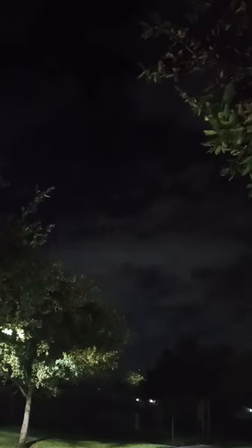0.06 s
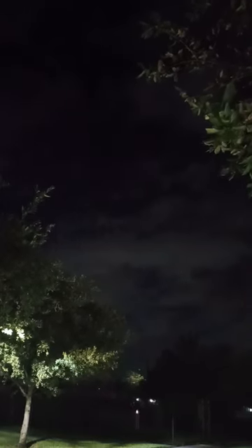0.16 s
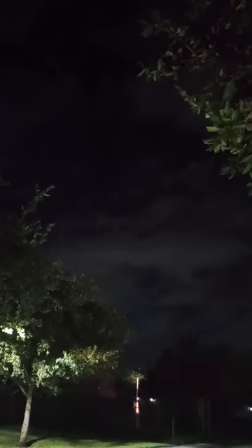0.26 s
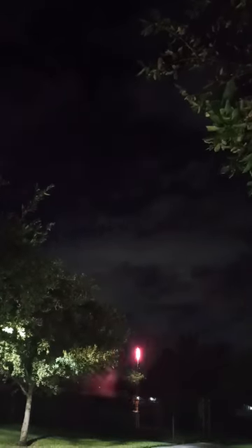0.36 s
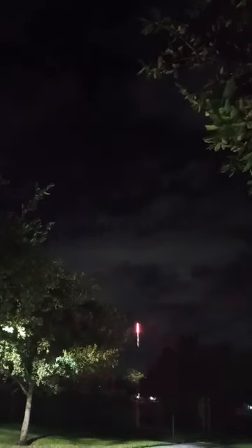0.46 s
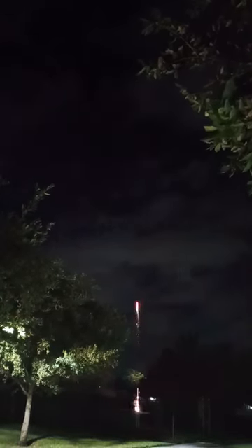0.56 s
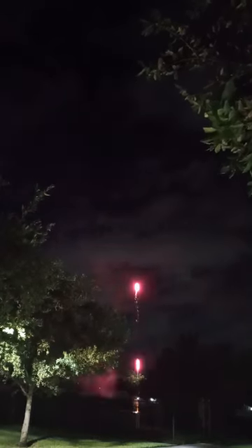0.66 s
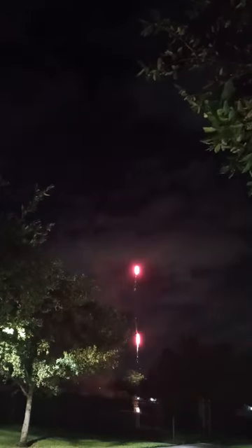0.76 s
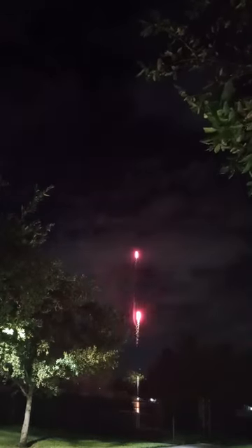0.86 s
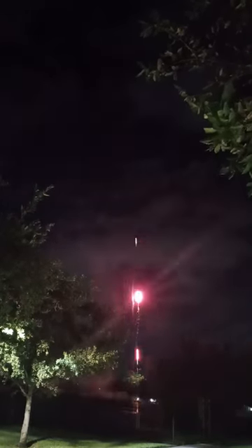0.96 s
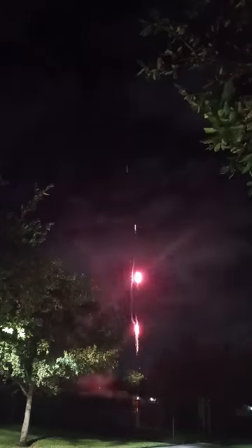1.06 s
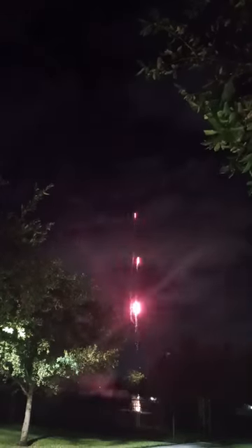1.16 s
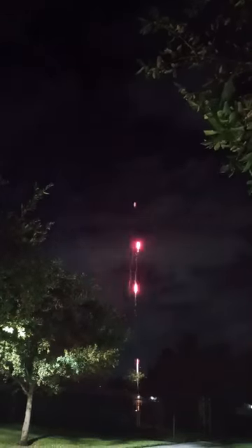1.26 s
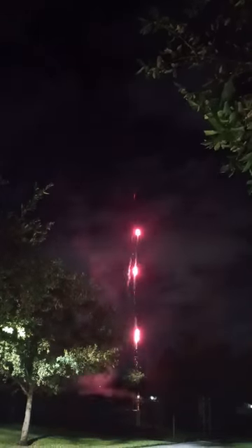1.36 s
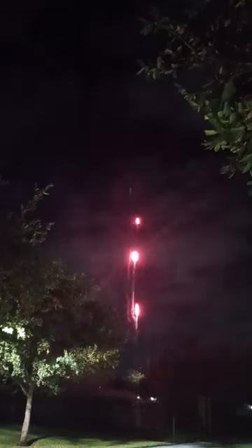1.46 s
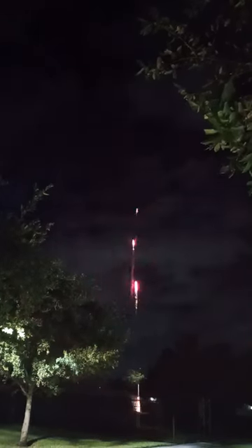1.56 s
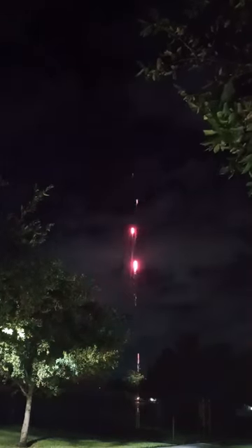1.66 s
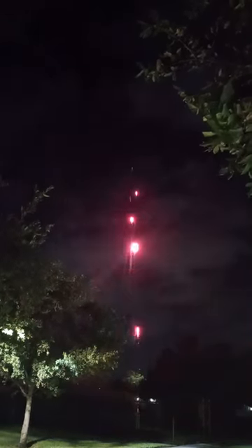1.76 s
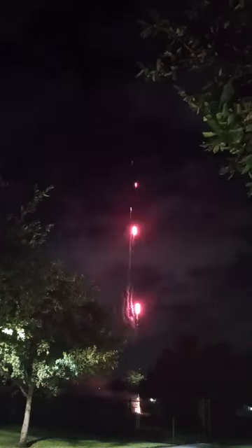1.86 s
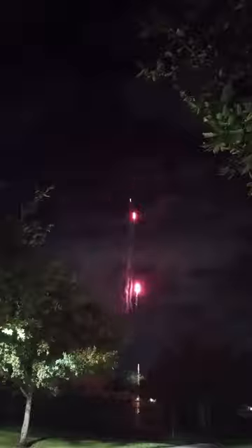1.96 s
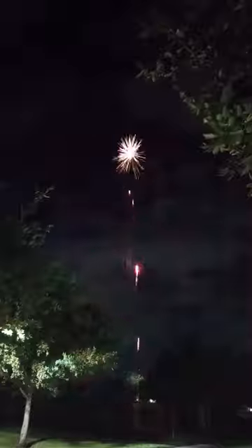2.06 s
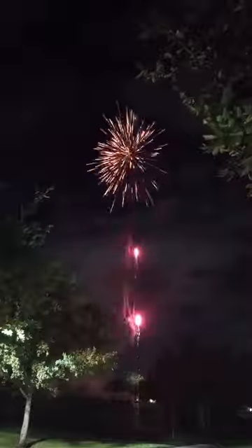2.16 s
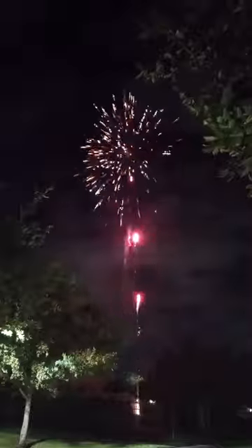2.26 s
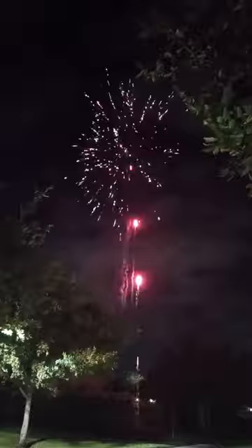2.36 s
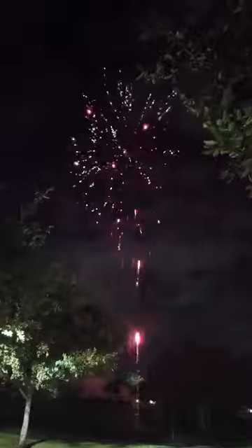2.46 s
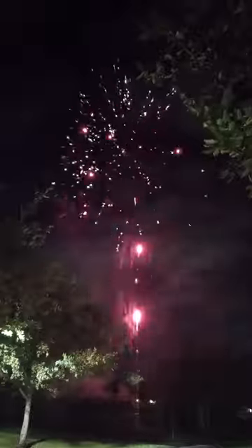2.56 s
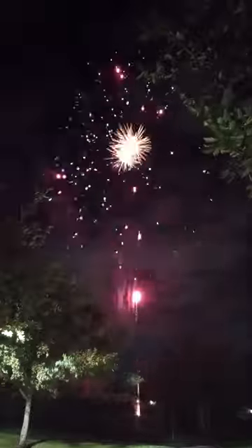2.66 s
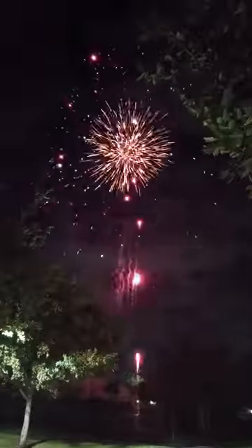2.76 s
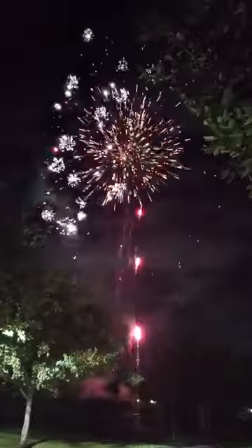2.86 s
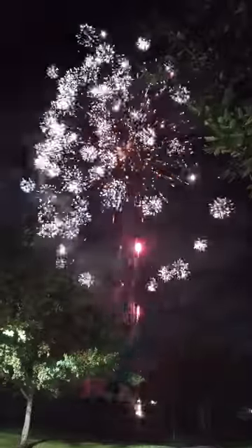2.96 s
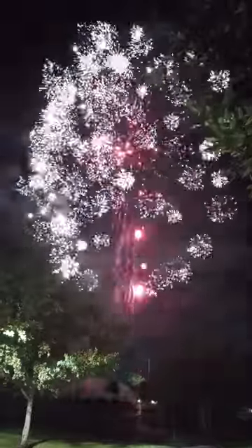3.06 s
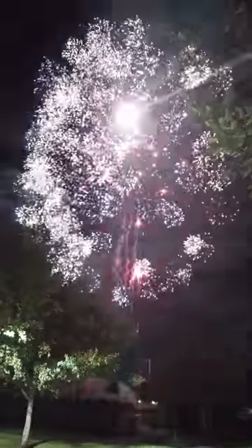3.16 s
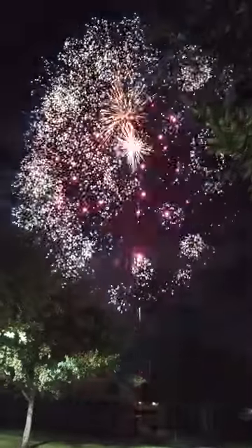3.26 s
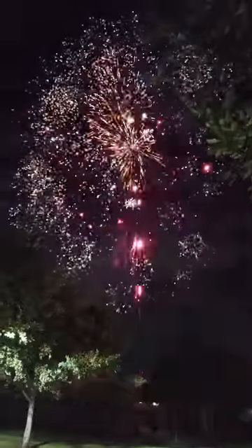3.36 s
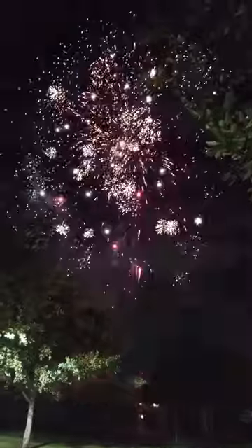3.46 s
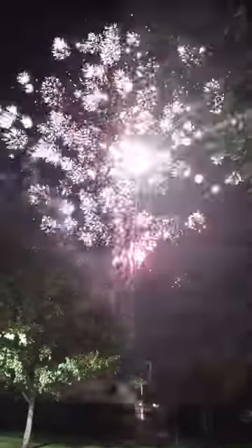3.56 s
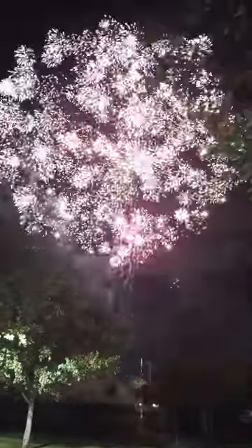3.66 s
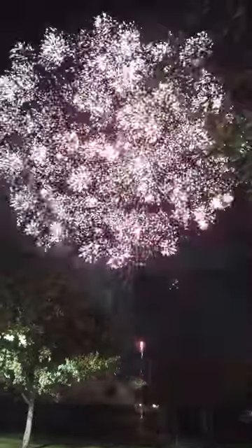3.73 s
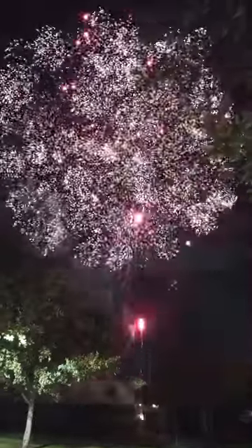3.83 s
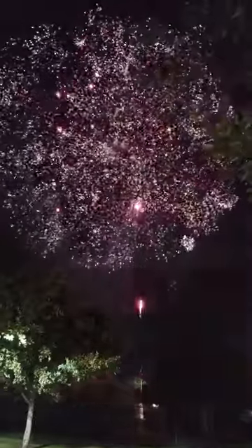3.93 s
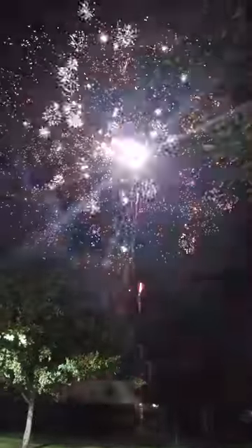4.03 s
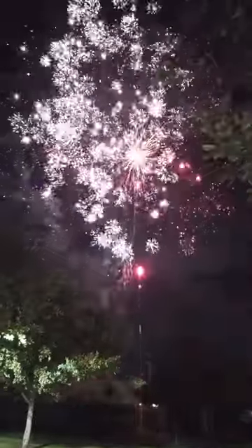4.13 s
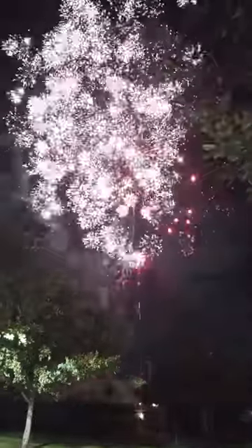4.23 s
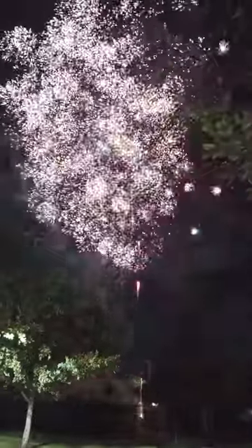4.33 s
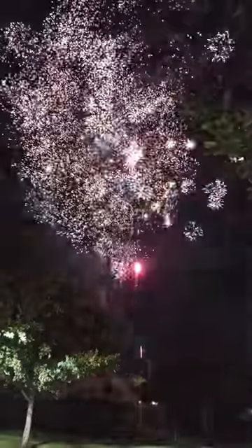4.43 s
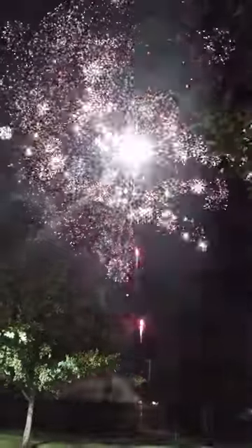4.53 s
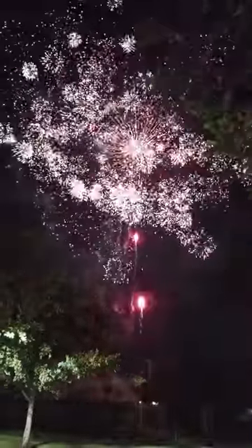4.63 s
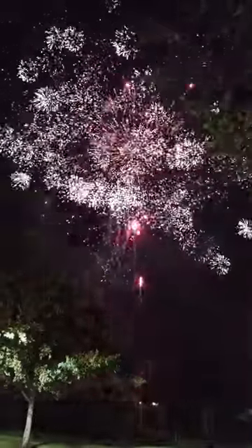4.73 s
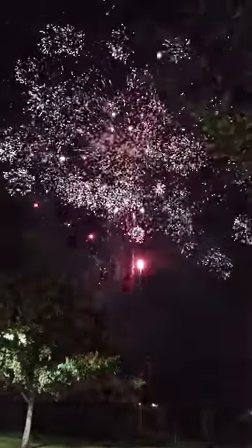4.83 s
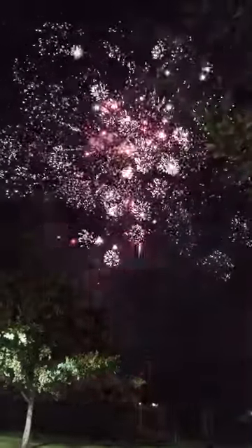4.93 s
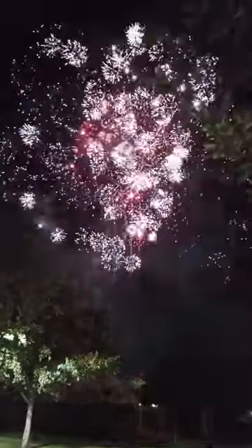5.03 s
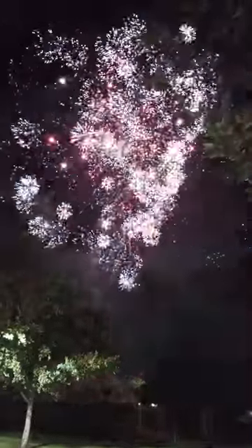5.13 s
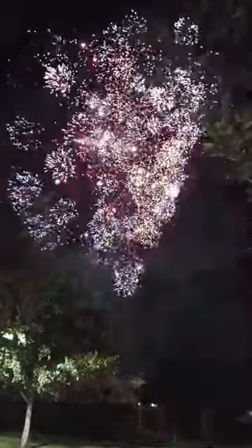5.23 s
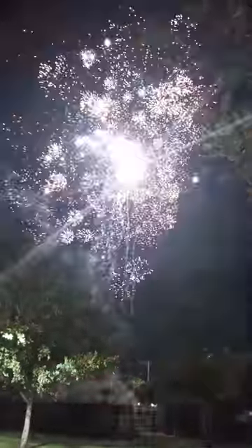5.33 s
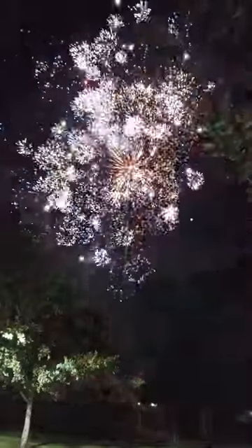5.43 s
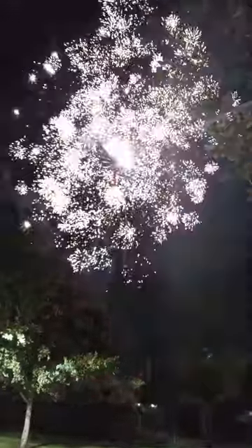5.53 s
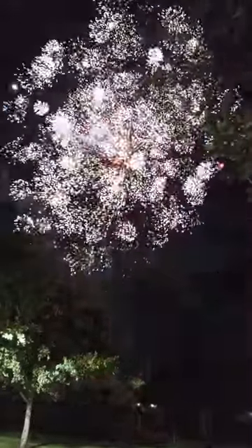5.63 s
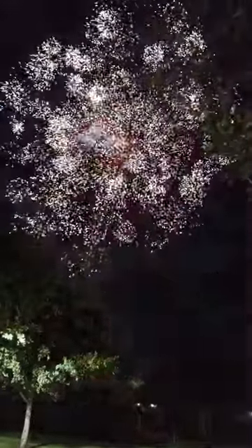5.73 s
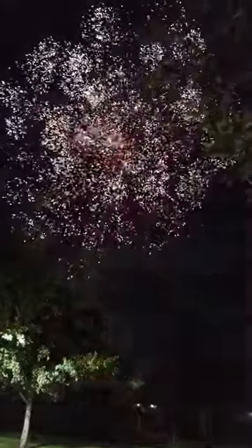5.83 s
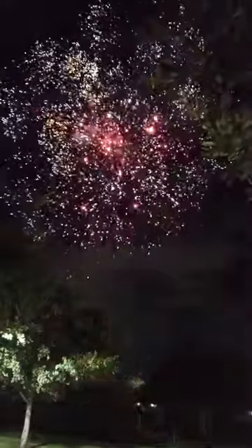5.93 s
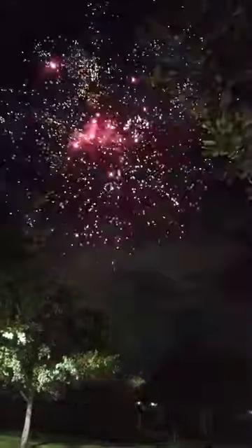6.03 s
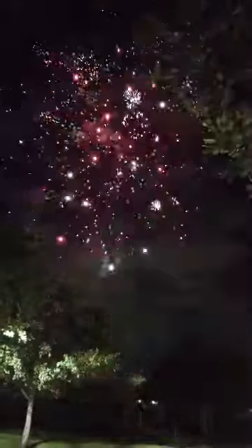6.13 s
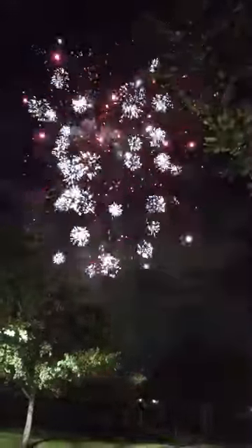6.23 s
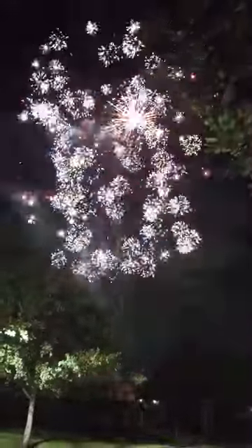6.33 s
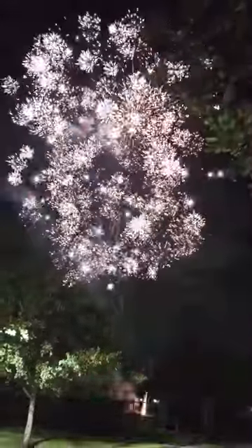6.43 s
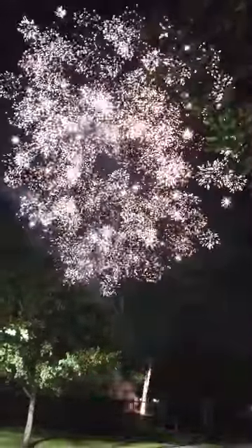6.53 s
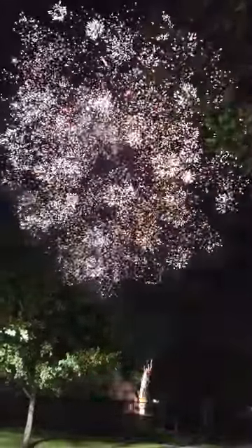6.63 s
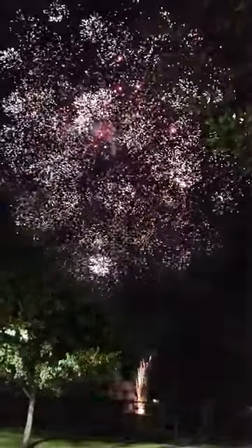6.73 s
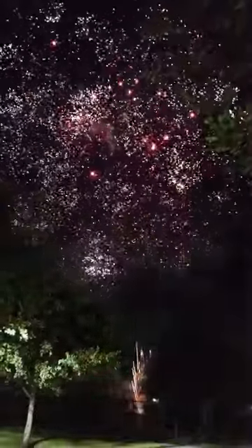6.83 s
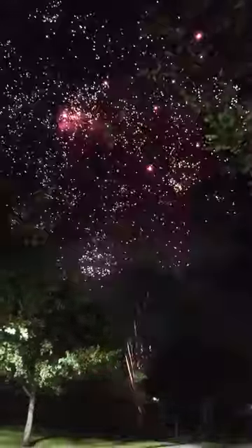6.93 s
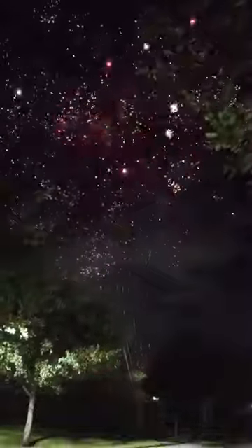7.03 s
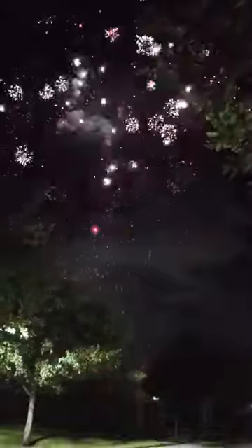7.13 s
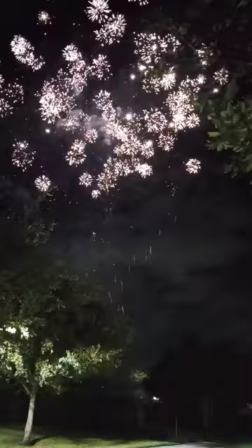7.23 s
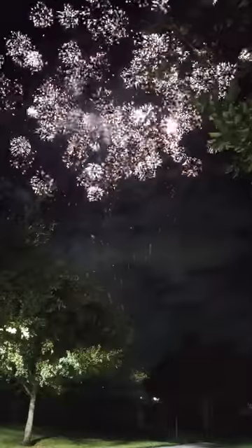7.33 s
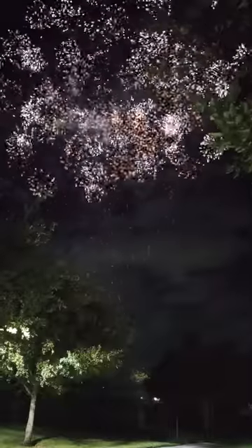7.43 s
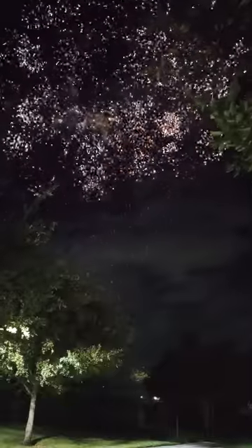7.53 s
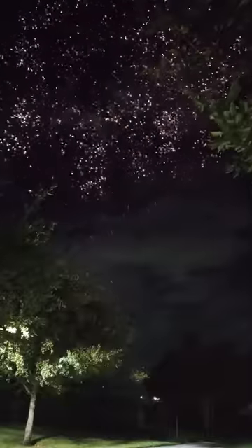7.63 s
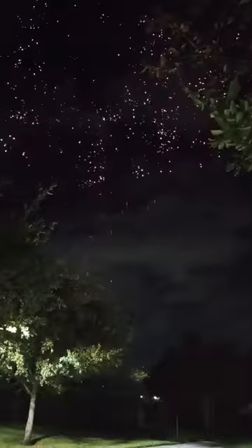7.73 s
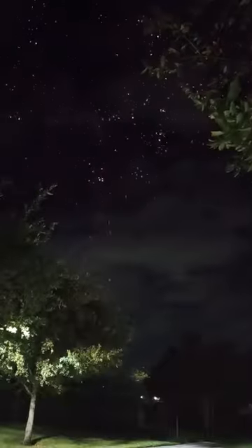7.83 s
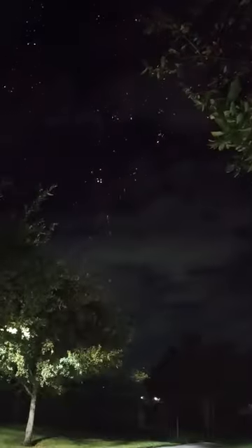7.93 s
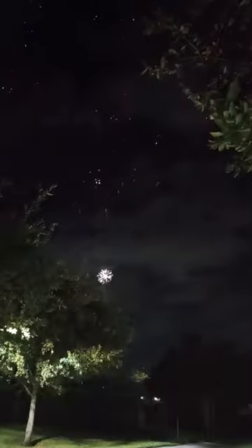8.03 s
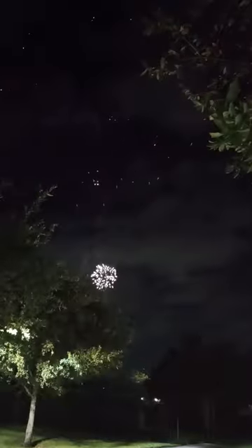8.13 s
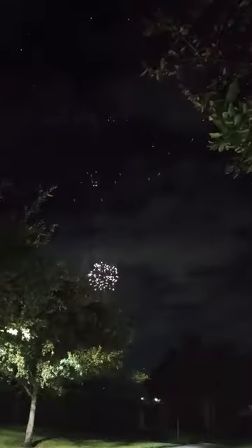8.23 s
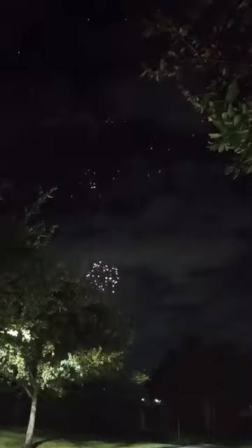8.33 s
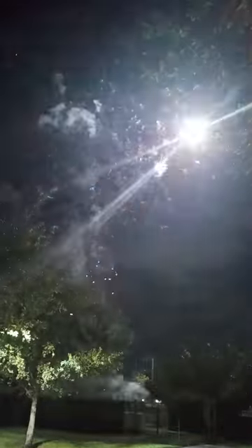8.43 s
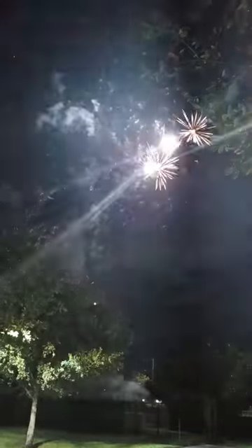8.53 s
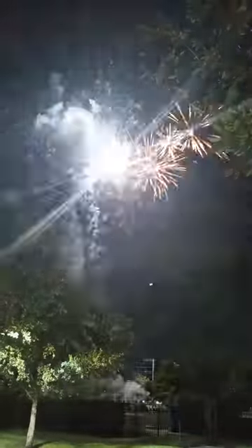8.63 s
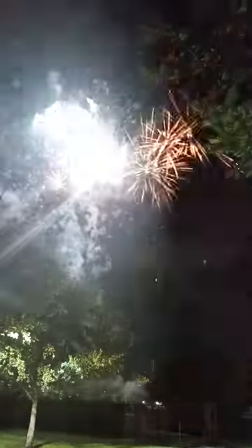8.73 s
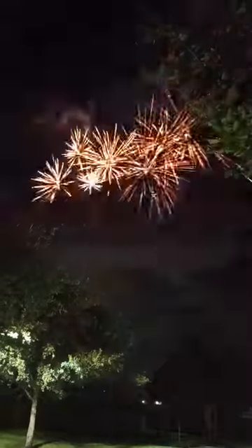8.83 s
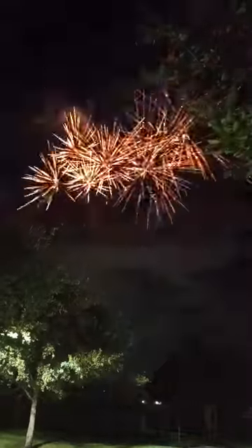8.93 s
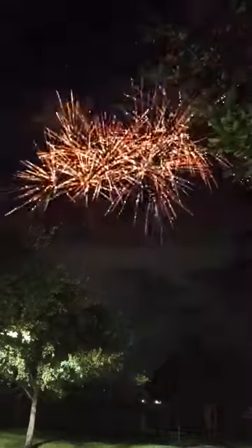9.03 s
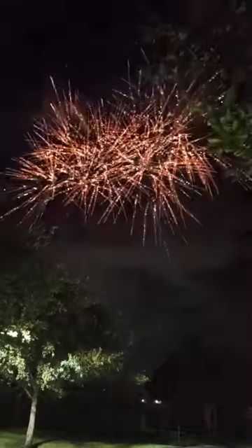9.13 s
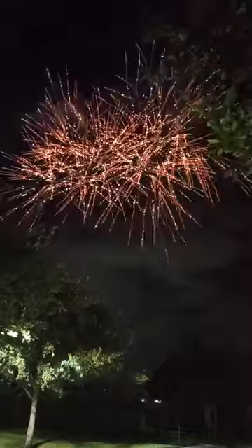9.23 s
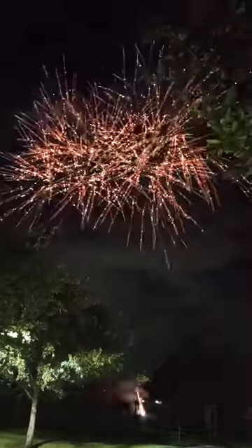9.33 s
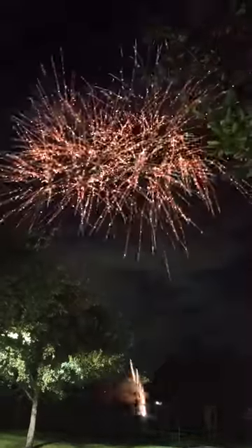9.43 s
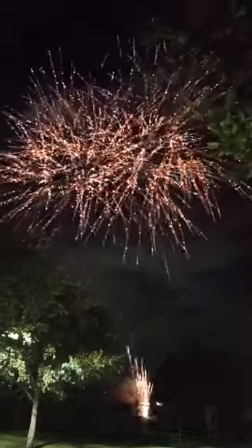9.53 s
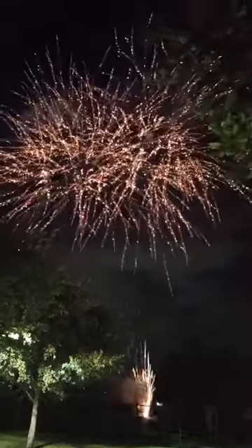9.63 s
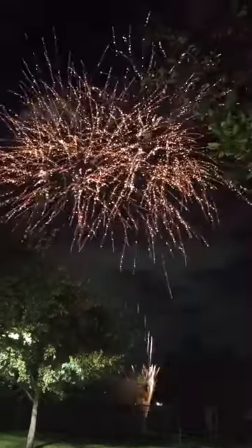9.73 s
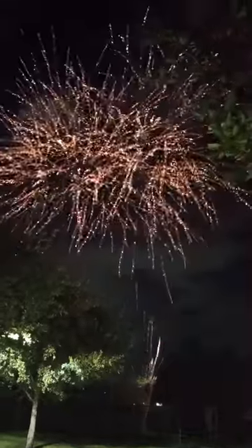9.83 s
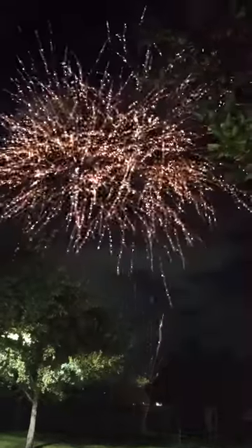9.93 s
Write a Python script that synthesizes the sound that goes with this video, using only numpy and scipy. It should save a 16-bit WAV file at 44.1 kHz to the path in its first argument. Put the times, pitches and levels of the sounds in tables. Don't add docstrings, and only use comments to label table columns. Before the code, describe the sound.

Outdoor night fireworks: hollow tube launches thump, then overloading aerial bangs boom overhead with dense crackling, a short lull, and a final rapid barrage.

```python
import sys
import numpy as np
from scipy import signal
from scipy.io import wavfile
from scipy.ndimage import uniform_filter1d

SR = 44100
rng = np.random.default_rng(int(sys.argv[2]) if len(sys.argv) > 2 else 0)


def persist_wave(psi):
    counts = np.round(np.clip(psi, -1, 1) * 32767).astype(np.int16)
    wavfile.write(sys.argv[1], SR, np.atleast_2d(counts).T)


def invert_db(level):
    return 10 ** (np.asarray(level, dtype=float) / 20)


N = 440118

# hz, density_db_per_hz
NIGHT_COLOUR = [(24, -47.5), (40, -8.5), (81, 14), (124, 2), (199, 0), (243, -4), (320, -8.5), (630, -4),
                (790, -12), (1090, -8.5), (5720, -27), (7170, -14), (8130, -40.5), (16000, -28)]
NIGHT_DB = -61
CRICKET_HZ, CRICKET_DB = 7200, -75

# hz, left_right_likeness
LIKENESS = [(60, 0.96), (180, 1), (550, 0.83), (1650, 0.000088), (4970, -0.023), (15000, 0.092)]
# hz, left_minus_right_db
LEAN = [(60, 2), (130, -0.5), (290, -1), (640, 1), (1410, -6.5), (3100, -2), (6820, -0.5), (15000, 2.5)]
# hz, loss_db_per_s
AIR_LOSS = [(60, -13.5), (300, 14), (1000, 0.5), (3000, 8), (6000, 22.5), (10000, 49.5), (16000, 63)]

# start_s, length_s, level_db, pitch_hz
VENTS = [
    (.392, 0.048, -50, 2150),
    (9.28, 0.12, -41, 3570),
    (9.794, 0.057, -59, 3735),
    (9.88, 0.086, -37, 3800),
]
# start_s, crack_db, thump_db, ring_hz
FUSE = [(.396, -40, -66, 2150)]
# start_s, crack_db, thump_db, ring_hz
LAUNCHES = [(0.4395, -12, -21, 3060), (0.7745, -12.5, -20.5, 3020), (1.031, -13.5, -19.5, 3130),
            (1.4029, -11.5, -19, 3300), (1.7694, -12.5, -18.5, 3020), (2.091, -14, -19, 3230),
            (2.853, -17, -22, 3110), (3.7423, -14.5, -23, 3200), (4.0977, -20.5, -29.5, 3200),
            (4.184, -28, -57, 3530)]
# start_s, crack_db, thump_db, ring_hz
VOLLEYS = [(6.801, -41, -25, 5690), (6.8392, -34, -27, 6200), (6.8699, -29, -56, 5250),
           (6.893, -34, -50, 5450), (6.9216, -29.5, -55, 5640), (6.95, -39, -53, 5650),
           (6.9772, -27.5, -35, 5770), (7.0192, -29.5, -30, 5100), (7.0628, -36, -53, 5140),
           (9.5385, -28.5, -31, 5625), (9.5764, -29, -32, 5320), (9.614, -26, -34, 7030),
           (9.6475, -34, -28.5, 9700), (9.698, -27, -26, 6200), (9.7335, -28, -52, 6500),
           (9.7728, -28, -35, 6200), (9.8267, -25.5, -32, 5950), (9.8705, -25, -36, 6850),
           (9.9126, -38, -52, 2000)]
# start_s, crack_db, thump_db, ring_hz
AFTER_RINGS = [(9.954, -44, -34, 3800)]
# pitch_hz, width_hz, level_db, t60_s
WIDE_RIM = [(2150, 260, 11.5, 0.019), (2480, 180, 0, 0.015), (6100, 410, -1, 0.031),
            (9800, 3400, -10, 0.0047)]
# pitch_hz, width_hz, level_db, t60_s
NARROW_RIM = [(2100, 440, 4, 0.043), (3800, 700, -2, 0.02), (9690, 780, -5.5, 0.023),
              (11600, 820, -6.5, 0.02), (15100, 900, -9, 0.025)]
# delay_s, level_db
LAUNCH_ECHOES = [(.0865, -6), (.19, -20)]
# delay_s, pitch_hz, width_hz, level_db, t60_s
HEDGE = (.192, 1500, 600, -17, 0.06)
# delay_s, level_db, hold_s, t60_s
LAUNCH_SCATTER = [
    [(0.00098, 3.5, .002, 0.12), (0.027, 0.5, 0.052, 0.22), (0.1, -7.5, 0.072, 0.33),
     (0.11, -10, 0.044, 1.4), (0.195, -9, 0.012, 0.06), (.26, -19.5, 0.033, 0.18)],
    [(.015, -1, 0.089, 0.24), (.015, -7.5, 0.039, 1.6), (.18, -12, 0.047, 0.74)],
]
# hz, density_db_per_hz
LAUNCH_COLOUR = [(18, -44), (30, -20), (175, 1.5), (305, -3), (544, -25), (707, -11), (1260, -11),
                 (1440, -20), (1640, -7), (2640, -15), (3820, -13), (5820, -17), (13200, -34), (15000, -27),
                 (16200, -64)]
# hz, density_db_per_hz
VOLLEY_COLOUR = [(18, -44), (30, -11), (75, 3), (211, -9), (366, -19), (654, -23), (1440, -16),
                 (1980, -10.5), (2860, -20), (3720, -18.5), (4970, -23), (6810, -21), (8640, -37),
                 (15000, -33), (16200, -53)]
THUMP_HZ, THUMP_MS = 214.5, 6.54
GROUND_DIP_HZ = 495

# start_s, blast_db, length_factor, roar_db, roar_fade_db_per_s
BURSTS = [(2.346, 0, 1.24, 0.5, -16), (2.94, 13.5, 0.95, 4, -5.5), (3.474, 0.5, 1, 1, 6),
          (3.518, 0.5, 1.13, -1, .1), (3.858, -0.5, 1.05, 1.5, 17), (4.346, 0.5, 0.93, -0.5, 2),
          (4.716, 1.5, 1.05, 0.5, 8), (4.856, 3.5, 0.89, 0.5, 24), (5.642, 0, 1.7, -1, 12),
          (5.825, 1.5, 1.23, -1.5, -1), (6.583, -3, 0.9, 0.5, 9), (8.706, 2, 0.65, -0.5, 13),
          (8.747, 0, 0.65, 0.5, 11), (8.815, 2.5, 0.75, -1.5, 11), (8.856, 1.5, 0.84, 0, 7),
          (8.949, 1.5, 0.79, -1, 8), (9.031, 2, 0.79, -2.5, 5), (9.067, 7, 0.83, 2.5, 11),
          (9.087, 5, 0.81, -12, 13), (9.097, -7, 0.65, -1.5, 16)]
# left_ms, right_ms, left_db, right_db, widening_factor
NEAR_PATHS = [(0, 0.18, 1.5, -2, 0.82), (1.55, 1.365, -9, -5.5, 0.48), (2.799, 2.9, -9, -3.5, 1.36),
              (5.4, 5.1, 0.5, -1, 1.084), (7.999, 7.7, -5, -8.5, 1.19)]
HOUSES_S = [.0445, .113, .16, .19, .485]
# level_db, stretch_factor, top_hz
BURST_ECHOES = [(-4, 1.177, 1250), (-21, 1.515, 750), (-23, 1.55, 440), (-9.5, 1.705, 237),
                (-28.5, 1.836, 160)]
# start_s, nearest_house_extra_db, far_houses_extra_db
SQUARE_ON = [(2.346, -4, -14), (2.94, -3, 1.5), (3.474, -5, -3), (3.858, -3.5, -2.5), (4.346, 3, 1.5),
             (4.716, -7, -3), (4.856, 0.5, 1.5), (5.642, 4, 4), (5.825, 2.5, -3), (6.583, .1, 0.8),
             (8.747, 1, -1)]
# delay_s, level_db, hold_s, t60_s
BURST_SCATTER = [
    [(0, 1, 0.039, 0.45), (0, -3.5, 0.02, 1.76), (.18, -19, 0.25, 0.23)],
    [(.014, -2.5, 0.023, 0.42), (.02, -13.5, .05, 1.7), (.18, -8, 0.026, 0.2), (.36, -25.5, 0.12, 0.2)],
]
# hz, density_db_per_hz
BURST_COLOUR = [(18, -44), (30, -14), (253, 7), (654, -8.5), (1370, -12.5), (1690, -12), (2640, -18),
                (3350, -14), (4590, -18.5), (5520, -14.5), (8190, -25.5), (11200, -25.5), (13200, -35.5),
                (15000, -20), (16200, -52)]
WALL_HZ, WALL_DB = 203.5, 1.5
FINALE_S, FINALE_BASS_DB = 8.5, -2.5
LINGER_PER_S = 3.2
ARRIVE_S = 0.0084

# start_s, level_db
KICKS = [(2.936, -11), (3.856, -19), (5.644, -27), (5.822, -18.5), (6.582, -19.5)]
KICK_LAG_S = .002

# start_s, rise_s, hold_s, fall_s, level_db
SWARMS = [(3.039, 0.16, 0.18, 0.11, -19.5), (3.613, 0.24, 0.11, 0.18, -18), (4.255, 0.096, 0.2, 0.2, -19),
          (4.902, 0.016, 0.012, 0.08, -21.5), (5.129, 0.092, 0.2, 0.025, -26.5),
          (5.486, 0.077, 0.048, 0.036, -29), (5.611, 0.028, 0.27, 0.046, -22.5),
          (6.412, 0.062, .12, 0.029, -28.5), (6.566, 0.015, 0.23, 0.14, -21),
          (7.361, .11, 0.17, 0.046, -23.5)]
# start_s, level_db, left_minus_right_db
POPS = [(5.448, -11, 4), (5.508, -18.5, -15), (6.369, -12.5, 6), (6.408, -21, -9), (6.457, -8, 3),
        (7.354, -16, 3), (7.387, -18.5, -9), (7.415, -23, -6), (7.683, -20, -6), (7.7, -23, 2),
        (8.297, -18, 1), (8.507, -38.5, 2), (5.125, -13, 3), (5.095, -17.5, -4), (5.16, -32, 0),
        (6.424, -15.5, 1)]
# start_s, level_db, left_minus_right_db
STARS = [(3.209, -10, 5), (3.313, -6, 5), (5.199, -18, 1), (5.219, -17, -5.5), (5.238, -17.5, 1),
         (5.288, -15.5, 3), (5.322, -8.5, 4), (5.334, -13, 0), (5.371, -12, -6), (5.393, -13, 4),
         (5.404, -16, -7), (5.457, -22, -6.5), (5.571, -19.5, 0), (5.591, -16, 2), (6.665, 0, 4),
         (6.72, -8, -2), (6.789, -8.5, 4), (6.813, -10, 4),
         (7.428, -29.5, -7.0), (7.427, -20.5, -3), (7.446, -25, -3.0), (7.464, -11, -4.0),
              (7.505, -14, -3.0), (7.523, -17, -13), (7.557, -14, -11), (7.6, -12, -6), (7.642, -17.5, -11),
              (7.684, -14.5, 0)]
# hz, density_db_per_hz
POP_COLOUR = [(59, -71), (100, -58), (160, -38), (239, -20.5), (303, -20), (435, -6), (473, -23), (725, -3),
              (1110, -2.5), (1320, -2.5), (2440, -6), (6500, -11.5), (12300, -33.5), (15200, -25),
              (16200, -11)]
# hz, density_db_per_hz
POP_TAIL_COLOUR = [(59, -45.5), (100, -24), (337, -9.5), (527, -15.5), (900, -19.5), (1700, -12),
                   (2440, -18), (3510, -13), (4720, -16.5), (6500, -16.5), (13400, -34), (14900, -25),
                   (16200, -57)]
# delay_s, level_db, hold_s, t60_s
POP_SCATTER = [
    [(0, 13, 0.027, 0.053), (.05, 19, 0.012, 0.1), (0, -4.5, 0.037, 4.73), (0.074, -23, 0.0078, 0.1)],
    [(0, 6.5, .002, 0.21), (.19, -4.5, 0.49, 9)],
]
SWARM_EDGE_DB = -22
CLUMP_S, CLUMP_DB = .008, 1.2
STAR_DB = 6
SKIM_HZ, SKIM_WIDTH_HZ, SKIM_DB = 1660, 460, 0


def evened(x):
    return x / np.sqrt(np.mean(x ** 2) + 1e-20)


def read(points, hz):
    f, value = np.transpose(points)
    return np.interp(np.log(hz + 1), np.log(f + 1), value)


def add(mix, s, sound):
    part = mix[..., max(round(s * SR), 0):][..., :sound.shape[-1]]
    part += sound[..., :part.shape[-1]]


def resonance(hz, q, x):
    return signal.lfilter(*signal.iirpeak(hz, q, SR), x)


def hiss(size, colour, loss=0., patchy_db=0.5):
    frames, hz = size // 256 + 5, np.fft.rfftfreq(1024, 1 / SR)
    a, b, c, d, patches = rng.standard_normal((frames, 513, 5)).T
    patches = uniform_filter1d(patches, size=11, axis=0)
    patches = evened(uniform_filter1d(patches, size=3, axis=1))
    same = np.clip(read(LIKENESS, hz), -1, 1)[:, None]
    left = a + 1j * b
    right = same * left + np.sqrt(1 - same ** 2) * (c + 1j * d)
    lean_db = read(LEAN, hz)[:, None] / 2
    z = np.array([invert_db(lean_db) * left, invert_db(-lean_db) * right])
    loss_db = loss * np.outer(read(AIR_LOSS, hz), np.arange(frames) * 256 / SR)
    shape = invert_db(read(colour, hz))
    z *= (shape / np.linalg.norm(shape))[:, None] * invert_db(patchy_db * patches - loss_db)
    return signal.istft(z, nperseg=1024, noverlap=768)[1][:, :size]


def night():
    chirp = resonance(CRICKET_HZ, 90, rng.standard_normal((2, N)))
    fade = invert_db(np.interp(np.arange(N) / SR, [.4, 2.4], [0, -4]))
    hum = invert_db(NIGHT_DB) * evened(hiss(N, NIGHT_COLOUR))
    return (hum + invert_db(CRICKET_DB) * evened(chirp)) * fade


def rings(modes, noise):
    t, out = np.arange(noise.shape[-1]) / SR, 0
    for hz, width_hz, db, t60_s in modes:
        q = hz / width_hz
        tone = resonance(hz, q, resonance(hz, q, noise))
        out = out + invert_db(db - 60 * t / t60_s) * evened(tone)
    return out


def vents():
    out = np.zeros((2, N))
    for s, length_s, db, hz in VENTS:
        air = rng.standard_normal((2, round(length_s * SR)))
        add(out, s, rings([(hz, 220, db, 2)], air) * np.sqrt(np.hanning(air.shape[1])))
    return out


def reflectors(t, groups):
    power = 0
    for s, db, hold_s, t60_s in groups:
        swell = np.clip((t - s) / ARRIVE_S + (s <= 0), 0, 1)
        power = power + (swell * invert_db(db - 60 * np.maximum(t - s - hold_s, 0) / t60_s)) ** 2
    return np.minimum(np.sqrt(power), invert_db(2))


def scatter(groups, colour, lasts_s, patchy_db=3.0, split_hz=450):
    t = np.arange(round(lasts_s * SR)) / SR
    noise = hiss(len(t), colour, 1., patchy_db) * np.minimum(5 - 5 * t / lasts_s, 1)
    bass = signal.sosfiltfilt(signal.butter(2, split_hz, fs=SR, output="sos"), noise)
    return reflectors(t, groups[0]) * (noise - bass), reflectors(t, groups[1]) * bass


def blast(ms, rise=0.069):
    u = np.arange(600) / SR * 1000 / ms * 2 * np.pi
    return np.cos(u) * np.exp(-.22 * u) * (1 - np.exp(-u / rise)) * (u < 1.5 * np.pi)


def launches(shots, mouth, colour, rim_db, ring_db, tail_db, unlike):
    out = np.zeros((2, N))
    tails = [sum(scatter(LAUNCH_SCATTER, colour, lasts_s=.9)) for _ in range(3)]
    age_s = np.maximum(np.arange(3000) / SR - .001, 0)
    thump = -np.sin(2 * np.pi * THUMP_HZ * age_s) * np.exp(-(age_s * 1000 / THUMP_MS) ** 3)
    thump *= np.minimum(age_s * 800, 1)
    muzzle = np.pad(blast(.5, rise=1.3), (0, 2400))
    muzzle = signal.lfilter(*signal.butter(2, 6500, fs=SR), muzzle)
    gas = rng.standard_normal((len(shots), 2, 3000))
    gas *= 1 + 2.27 * np.exp(-np.arange(3000) / 40)
    gas[..., 4] = 20
    odds = rng.uniform(-1, 1, (len(shots), len(mouth), 2))
    for k, (s, db, thump_db, ring_hz) in enumerate(shots):
        late = rings([HEDGE[1:]], gas[k, :, :99:-1]) * np.minimum(np.arange(2900) / 500, 1)
        add(out, s + HEDGE[0], invert_db(db) * late)
        modes = [(ring_hz, 450, ring_db, .04)]
        for (hz, width_hz, mode_db, t60_s), (a, b) in zip(mouth, odds[k]):
            modes.append((hz * (1 + .02 * unlike * a), width_hz, mode_db + unlike * b, t60_s))
        rim = invert_db(rim_db) * rings(modes, gas[k]) * [[.6], [.9]]
        crack = rim + [7 * muzzle, np.roll(4 * muzzle, shift=12)]
        for later_s, echo_db in [(0.0011, 0.018)] + LAUNCH_ECHOES:
            add(out, s + later_s + .0006, invert_db(db - 11 + 2 * echo_db) * crack)
            crack = uniform_filter1d(crack, size=5, axis=1)
            add(out, s + later_s, invert_db(thump_db + 8 + echo_db) * thump)
        add(out, s, invert_db(tail_db + db) * tails[k % 3])
    return signal.lfilter(*signal.iirnotch(GROUND_DIP_HZ, 1.8, SR), out)


def from_sky(make, wobble):
    out = np.zeros((2, 2000))
    for (left_ms, right_ms, left_db, right_db, wide), shift in zip(NEAR_PATHS, wobble):
        add(out[0], left_ms * (1 + shift[0]) / 1000, invert_db(left_db) * make(wide))
        add(out[1], right_ms * (1 + shift[1]) / 1000, invert_db(right_db) * make(wide))
    return out


def square_on_db(s, later_s):
    return sum(far_db if later_s > .1 else near_db
               for at_s, near_db, far_db in SQUARE_ON if abs(at_s - s) < .01)


def bursts():
    out = np.zeros((2, N))
    tails = [scatter(BURST_SCATTER, BURST_COLOUR, lasts_s=1.5, patchy_db=1.8) for _ in range(4)]
    wobbles = 0.068 * rng.standard_normal((len(BURSTS), len(NEAR_PATHS), 2))
    for k, (s, db, length, roar_db, fade_db) in enumerate(BURSTS):
        add(out, s + .0006, invert_db(db + 6.0) * from_sky(lambda wide: blast(3.53 * length * wide), wobbles[k]))
        for later_s, (echo_db, far, top_hz) in zip(HOUSES_S, BURST_ECHOES):
            shock = from_sky(lambda wide: blast(2.0 * far), wobbles[k] + far - 1)
            dull = signal.lfilter(*signal.butter(2, top_hz, fs=SR), shock)
            dull = dull + invert_db(WALL_DB) * resonance(WALL_HZ, 4.5, shock)
            add(out, s + later_s, invert_db(roar_db + echo_db + square_on_db(s, later_s)) * dull)
        treble, bass = tails[k % 4]
        age_s = np.minimum(np.arange(bass.shape[1]) / SR, .6)
        bass = invert_db(FINALE_BASS_DB * (s > FINALE_S)) * length ** (LINGER_PER_S * age_s) * bass
        add(out, s, invert_db(roar_db - 13.0 - fade_db * age_s) * (treble + bass))
    return out


def kicks():
    out, swing = np.zeros((2, N)), np.sin(np.linspace(0, 2 * np.pi, 900)) * np.hanning(900)
    for s, kick_db in KICKS:
        add(out[0], s, invert_db(kick_db + 5) * swing)
        add(out[1], s + KICK_LAG_S, invert_db(kick_db + 10.5) * swing)
    return out


def causal(colour):
    gain = np.log(invert_db(np.maximum(read(colour, abs(np.fft.fftfreq(2048, 1 / SR))), -100)))
    taps = np.fft.ifft(np.exp(gain - 1j * signal.hilbert(gain).imag)).real[:1024]
    return taps / np.linalg.norm(taps)


def swarm_db(t):
    db = np.full(N, -90.)
    for s, rise_s, hold_s, fall_s, full_db in SWARMS:
        corners = np.cumsum([s, rise_s, hold_s, fall_s])
        shape = np.interp(t, corners, [SWARM_EDGE_DB, 0, 0, SWARM_EDGE_DB], -90, -90)
        db = np.maximum(db, full_db + shape)
    return db


def crackle(most_per_s=1500, thinning=.7, spread_db=2.5):
    clump = round(CLUMP_S * SR)
    clumps = uniform_filter1d(uniform_filter1d(rng.standard_normal(N), clump), clump)
    db = swarm_db(np.arange(N) / SR) + CLUMP_DB * evened(clumps)
    chance = np.minimum(most_per_s / SR * invert_db(thinning * (db + 27.0)), .05)
    size = invert_db(spread_db * np.minimum(rng.exponential(1, N), 4) - 9.5)
    pops = size * (rng.random(N) < chance) * invert_db(db) / np.sqrt(chance)
    place, snap, out = rng.integers(0, 4, N), causal(POP_COLOUR), np.zeros((2, N))
    wobbles = .12 * rng.standard_normal((4, len(NEAR_PATHS), 2))
    paths = [from_sky(lambda wide: snap / wide ** 2, wobble) for wobble in wobbles]
    for k, path in enumerate(paths):
        out += invert_db(-4.0) * signal.oaconvolve((pops * (place == k))[None], path, axes=1)[:, :N]
    stars = [(s, min(star_db, -9) + STAR_DB, pan_db) for s, star_db, pan_db in STARS]
    for k, (s, pop_db, pan_db) in enumerate(POPS + stars):
        add(out, s, invert_db(pop_db - 2 + np.array([[.5], [-.5]]) * pan_db) * paths[k % 4])
        add(pops, s, invert_db(pop_db + 10.0) * np.ones(1))
    tail = sum(scatter(POP_SCATTER, POP_TAIL_COLOUR, lasts_s=1.5))
    tail = tail / np.linalg.norm(tail[0])
    out = out * invert_db(np.array([[-1.5], [1.5]]))
    out = out + invert_db(-10.5) * signal.fftconvolve(pops[None], tail, axes=1)[:, :N]
    return out + invert_db(SKIM_DB) * resonance(SKIM_HZ, SKIM_HZ / SKIM_WIDTH_HZ, out)


def scene():
    wide = launches(FUSE + LAUNCHES, WIDE_RIM, LAUNCH_COLOUR,
                    rim_db=-12, ring_db=-0.5, tail_db=-16.5, unlike=1.2)
    narrow = launches(VOLLEYS + AFTER_RINGS, NARROW_RIM, VOLLEY_COLOUR,
                      rim_db=-3.0, ring_db=4.5, tail_db=-11.5, unlike=5.2)
    return night() + vents() + wide + bursts() + crackle() + narrow


def rounded(x, knee):
    return x / (1 + abs(x) ** knee) ** (1 / knee)


def highpass(x, hz):
    return signal.sosfiltfilt(signal.butter(2, hz, "high", fs=SR, output="sos"), x)


def band_limit(x):
    return signal.sosfilt(signal.butter(12, 16400, fs=SR, output="sos"), x)


def record(dry):
    thin = highpass(rounded(dry, 3.5), 75)
    full = highpass(rounded(1.2 * thin, 10.), 40)
    full = np.clip(1.03 * full + kicks(), -1, 1)
    edge = signal.firwin(255, 15600, window=("kaiser", 7), fs=SR)[None]
    return band_limit(signal.oaconvolve(full, edge, "same", axes=1))


dry = scene()
out = record(dry)
persist_wave(out)
```